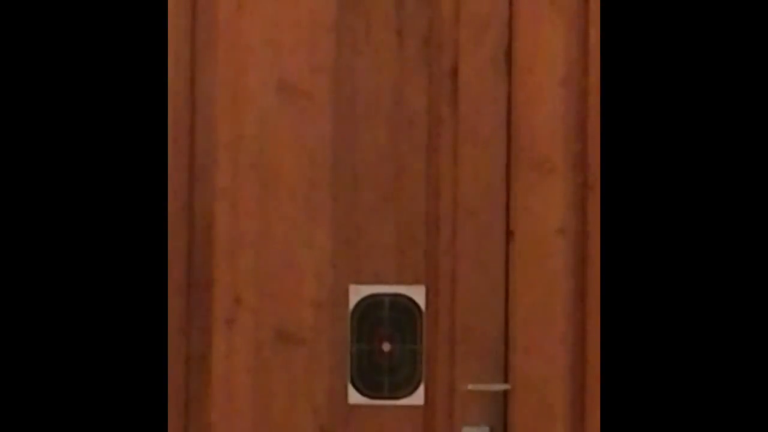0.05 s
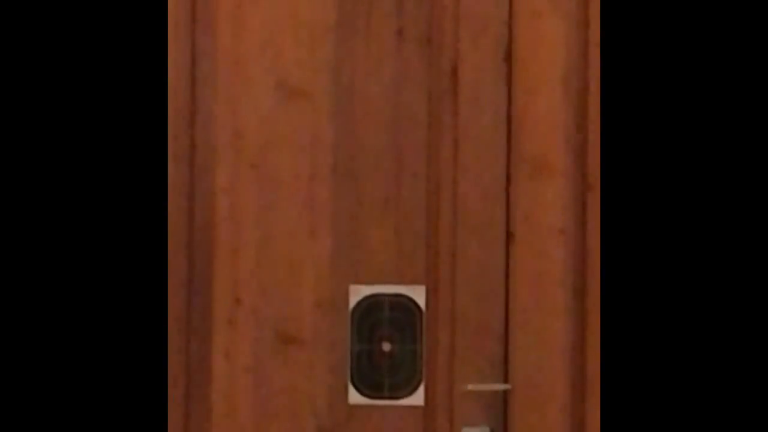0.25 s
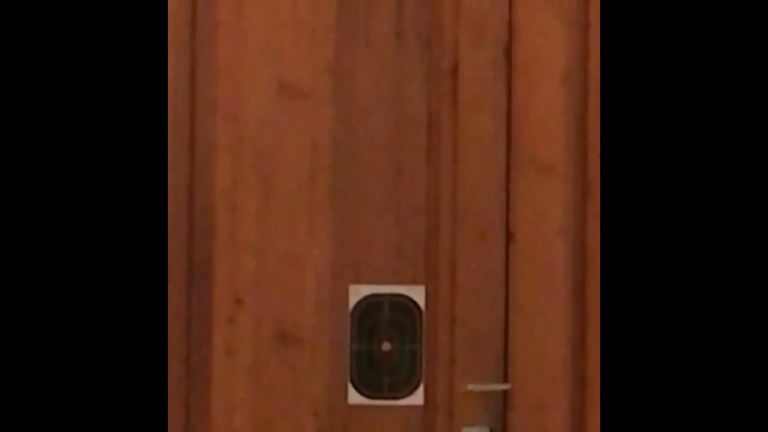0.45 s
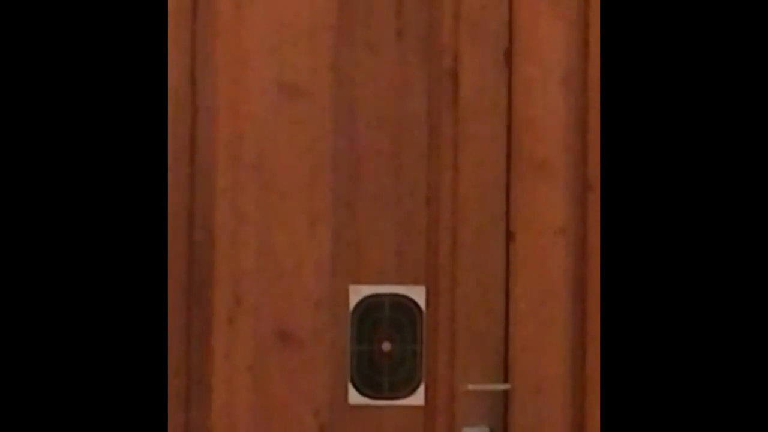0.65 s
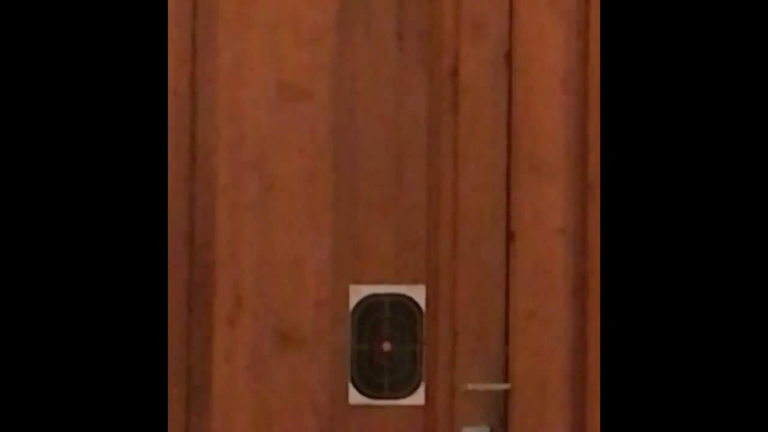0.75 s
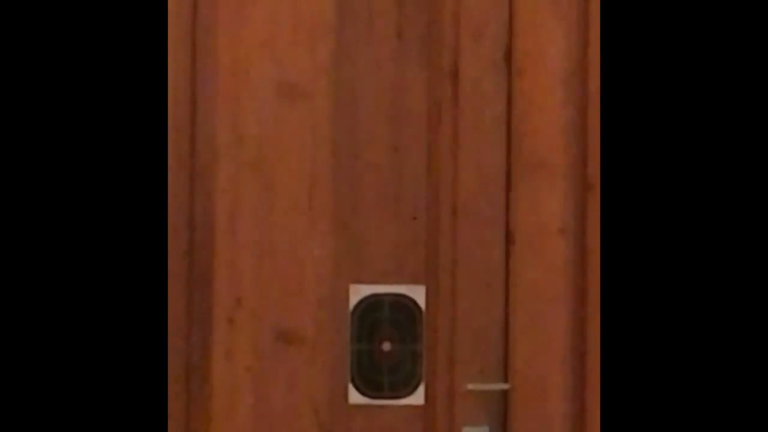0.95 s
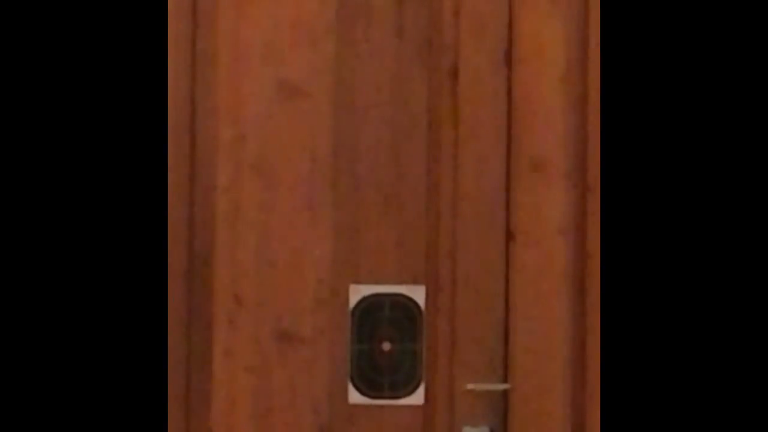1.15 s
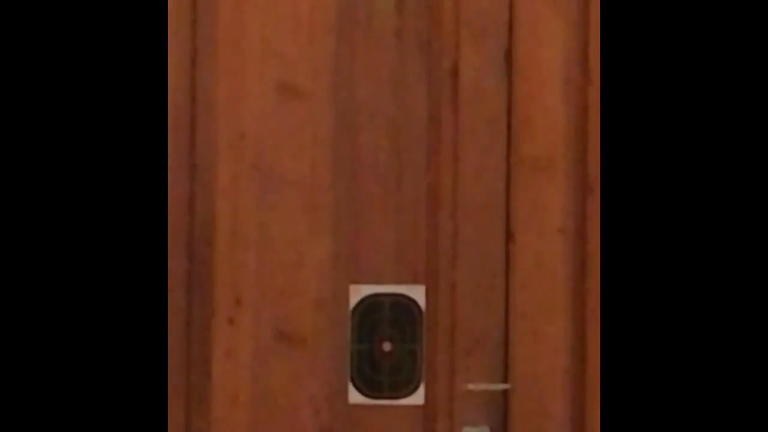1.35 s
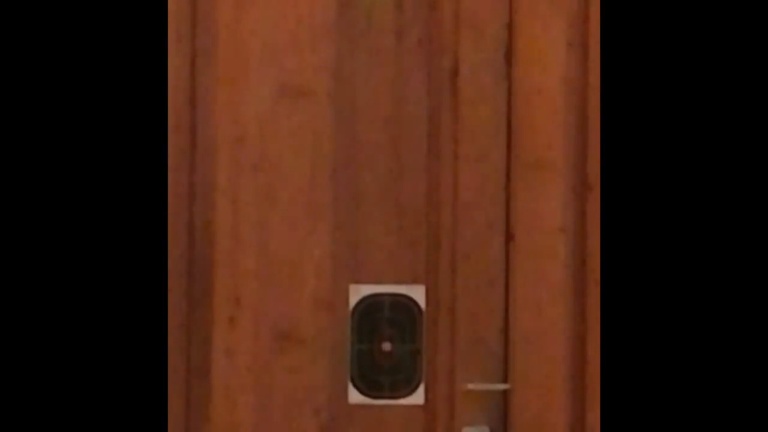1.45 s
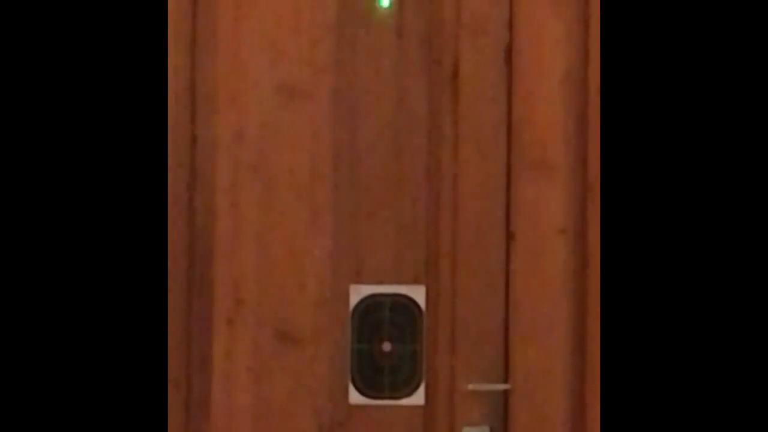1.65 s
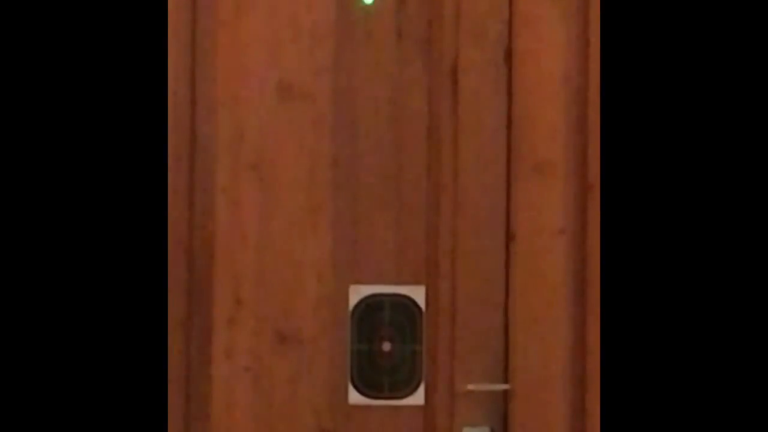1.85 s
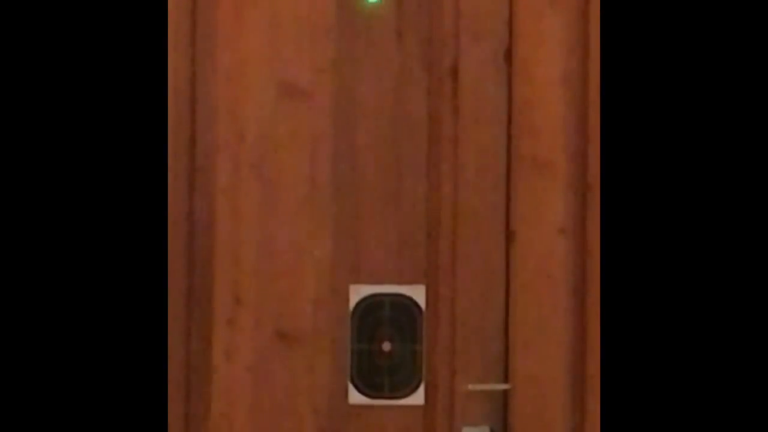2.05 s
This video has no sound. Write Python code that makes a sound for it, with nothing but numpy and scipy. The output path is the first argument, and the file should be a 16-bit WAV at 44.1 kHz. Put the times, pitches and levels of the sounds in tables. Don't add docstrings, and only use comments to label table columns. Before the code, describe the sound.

One loud metallic snap of an empty pistol's striker, ringing briefly over a faint appliance hum

```python
import sys
import numpy as np
from scipy import signal
from scipy.fft import rfft, irfft
from scipy.io import wavfile

SR = 44100
rng = np.random.default_rng(int(sys.argv[2]) if len(sys.argv) > 2 else 0)


def linear_from_db(decibels):
    return 10 ** (np.asarray(decibels, float) / 20)


def bounce(signal):
    frames = np.transpose(np.atleast_2d(signal))
    limited = np.clip(frames, -1, 1)
    pcm = np.round(limited * 32767).astype(np.int16)
    wavfile.write(sys.argv[1], SR, pcm)


N = 93403
BLOW_S = 1.79073


def evened(x):
    return x / np.sqrt(np.mean(x ** 2) + 1e-20)


def read(points, hz):
    f, value = np.transpose(points)
    return np.interp(np.log(hz + 1), np.log(f + 1), value)


def add(mix, s, sound):
    part = mix[round(s * SR):][:len(sound)]
    part += sound[:len(part)]


def resonate(x, hz, width):
    turn = np.exp(2j * np.pi * hz * np.arange(len(x)) / SR)
    r = np.exp(-np.pi * width / SR)
    return 2 * (turn * signal.lfilter([1 - r], [1, -r], x / turn)).real


def colour(x, points):
    hz = np.fft.rfftfreq(len(x), 1 / SR)
    return irfft(rfft(x) * linear_from_db(read(points, hz)), len(x))


# (frequency [Hz], level [dB per Hz])
AIR_COLOUR = [(20, -49), (60, -1), (150, -3.5), (500, -7.5), (1090, -17), (2200, -23.5), (5000, -27.5),
              (16000, -37)]
# (frequency [Hz], width [Hz], gain [dB])
PORT_DIPS = [(7400, 500, -2.5), (10300, 700, -3)]


def room_tone():
    hz = np.fft.rfftfreq(N, 1 / SR)
    dips = sum(db * np.exp(-((hz - f) / width) ** 2) for f, width, db in PORT_DIPS)
    noise = irfft(rfft(rng.standard_normal(N)) * linear_from_db(dips), N)
    return linear_from_db(-61) * evened(colour(noise, AIR_COLOUR))


# (frequency [Hz], width [Hz], level [dB])
HUM = [(68.5, 32, -63), (123, 11, -74), (411, 4.2, -74.5), (584.4, 83.4, -59), (581, 4.7, -65.5),
       (890, 51, -70.5), (1620, 220, -73.5)]
# (frequency [Hz], level [dB])
MOTOR = [(156.5, -63), (337, -66)]


def appliance():
    out, t = np.zeros(N), np.arange(N) / SR
    for hz, width, db in HUM:
        band = resonate(rng.standard_normal(N), hz, width)
        out += linear_from_db(db) * evened(resonate(band, hz, 2 * width))
    waver = evened(resonate(rng.standard_normal(N), 0, 3.4))
    for hz, db in MOTOR:
        out += linear_from_db(db + 3 + 1.5 * waver) * np.sin(2 * np.pi * hz * t + .4 * waver)
    return out


def camera_whine():
    t, whine_hz = np.arange(N) / SR, 991.9
    whine = sum(np.sin(2 * np.pi * (k * whine_hz * t + rng.random())) for k in range(2, 16))
    return linear_from_db(-97.5) * whine


# (frequency [Hz], time to fall 60 dB [s])
ROOM_DECAY = [(700, 0.33), (1500, 1), (3000, 0.78), (6000, 0.94), (9000, 0.75), (12000, 0.49),
              (16000, 0.61)]
# (frequency [Hz], gain [dB])
ROOM_COLOUR = [(500, -8.5), (1000, -7), (2000, 2.5), (5000, 1.5), (10000, 0), (16000, -2)]


def room():
    fill_db, early_db, early_t60 = -16, 4.5, 0.26
    hz, t, z = signal.stft(rng.standard_normal(SR // 2), SR, nperseg=512)
    peaks = sum(linear_from_db(db) ** 2 / (1 + (2 * (hz - f) / width) ** 2) for f, width, db in STEEL)
    tint = np.sqrt(peaks + linear_from_db(fill_db) ** 2) * linear_from_db(read(ROOM_COLOUR, hz))
    late = linear_from_db(-60 * t / read(ROOM_DECAY, hz)[:, None])
    early = linear_from_db(early_db - 60 * t / early_t60)
    echoes = signal.istft(z * (late + early) * tint[:, None], SR, nperseg=512)[1]
    arrival = np.clip((np.arange(len(echoes)) / SR - .006) / 0.0087, 0, 1)
    out = np.zeros(N)
    add(out, BLOW_S, linear_from_db(-16) * echoes * arrival)
    return out


# (time [s], level [dB], frequency [Hz], time to fall 60 dB [s])
KNOCKS = [(1.7677, -31, 620, .012), (1.7762, -33, -400, .06), (1.7805, -19, 332, .0154),
          (1.7832, -15, -210, .0215), (1.78795, -4.4, 257, .0124), (1.7916, -5, 362, .0214),
          (1.79135, -1, -1050, .004), (1.79075, -2, -3100, .004), (1.7861, -21, 2900, .008),
          (1.7932, -14, 1150, .008), (1.7945, -15, 4608, .03), (2.103, -40, 2880, .022)]


def knocks():
    out, t = np.zeros(N), np.arange(SR // 4) / SR
    for s, db, hz, t60 in KNOCKS:
        onset = np.sin(np.pi / 2 * np.minimum(2.4 * abs(hz) * t, 1))
        add(out, s, linear_from_db(db - 60 * t / t60) * onset * np.sin(2 * np.pi * hz * t))
    return out


def jolt():
    hz, level_db, t60, stop_s = 50.6, -2.4, .086, .042
    sweep_turns, sweep_s = 1.53, .00214
    swell, swell_s = .88, .0045
    out, t = np.zeros(N), np.arange(SR // 4) / SR
    turns = hz * t + sweep_turns * (1 - np.exp(-t / sweep_s))
    growth = 1 + swell * (1 - np.exp(-(t / swell_s) ** 2))
    stop = np.exp(-(t / stop_s) ** 6)
    add(out, BLOW_S, growth * stop * linear_from_db(level_db - 60 * t / t60) * np.sin(2 * np.pi * turns))
    sway_s, sway_length_s, sway_db, sway_hz = 1.8277, .075, -42, 35.4
    sway = np.sin(np.pi * np.minimum(t / sway_length_s, 1)) * np.cos(2 * np.pi * sway_hz * t)
    add(out, sway_s, linear_from_db(sway_db) * sway)
    return out


RING_HZ = [1972, 3577, 4469, 4615, 4716, 5679, 5963, 5992, 7483, 9177, 9249, 9532, 11181, 12807]
# (level [dB], time to fall 60 dB [s])
RINGS = [(-51, .6), (-47, .4), (-51, .37), (-47, .4), (-48, .4), (-49, .6), (-46, .4), (-39, .6),
         (-45, .32), (-39, .45), (-42, .45), (-41, .35), (-43, .25), (-42, .3)]


def rings():
    out, t = np.zeros(N), np.arange(SR // 2) / SR
    onset = np.minimum(t / .004, 1)
    for hz, (db, t60) in zip(RING_HZ, RINGS):
        add(out, BLOW_S, linear_from_db(db + 7 - 60 * t / t60) * onset * np.sin(2 * np.pi * hz * t))
    return out


TICK_S = [1.7673, 1.7706, 1.7790, 1.7837, 1.7859, 1.7903, 1.7908, 1.7930, 1.7953, 1.8018]
# (level [dB], crack length [s], brightness [about 1.5 dB per octave above 1800 Hz])
TICKS = [
    (-43, 0.0014, -1),
    (-49, 0.0017, 3.5),
    (-46.5, 0.0018, -3.5),
    (-33, 0.0034, -11),
    (-29, 0.0022, -4.5),
    (-9.5, 0.00069, -5.5),
    (-14, 0.0018, -2.5),
    (-16.5, .0022, 3),
    (-14, 0.0033, 1.5),
    (-22, 0.0064, 1.5),
]
# (frequency [Hz], width [Hz], level [dB])
STEEL = [(1560, 250, -19), (1990, 69, -12.5), (3546, 150, -5.5), (4520, 94, -3.5), (4600, 190, -8),
         (5660, 150, -14), (6000, 170, -3), (7310, 110, -7.5), (8350, 230, -15), (9390, 427, 2.5),
         (11570, 240, -2.5), (12880, 240, 2), (13400, 170, -12), (15200, 390, -18)]


def steel():
    drive, t = np.zeros(N), np.arange(512) / SR
    for s, (db, length, tilt_db) in zip(TICK_S, TICKS):
        tilt = [(900, 0), (1800, -1.6 * tilt_db), (16000, 3.2 * tilt_db)]
        crack = evened(colour(rng.standard_normal(512), tilt))
        shape = np.minimum(t / .0003, 1) * np.exp(-(t / length) ** 2)
        add(drive, s, linear_from_db(db) * crack * shape)
    ringing = sum(linear_from_db(db + 13) * resonate(drive, hz, width) for hz, width, db in STEEL)
    return linear_from_db(0.5) * drive + ringing


def scene():
    background = room_tone() + appliance() + camera_whine()
    pistol = knocks() + jolt() + rings() + steel()
    return (background + room() + pistol)[None]


def band_limit(x):
    return signal.sosfilt(signal.butter(12, 16540, fs=SR, output="sos"), x)


def record(dry):
    trip_level, duck_db, hold_s, release_s = .33, -6, .197, .018
    low_cut_hz, low_cut_share, low_cut_after_s = 200, .7, .11
    since = np.arange(N) / SR - np.argmax(abs(dry[0]) > trip_level) / SR
    drop = np.clip(since / .0003 + 1, 0, 1)
    let_go = np.clip(1 - (since - hold_s) / release_s, 0, 1)
    bass = signal.sosfiltfilt(signal.butter(2, low_cut_hz, fs=SR, output="sos"), dry)
    low_cut = low_cut_share * np.clip((since - low_cut_after_s) / release_s, 0, 1)
    mix = (dry - low_cut * bass) * linear_from_db(duck_db * drop * let_go)
    mix = signal.oaconvolve(mix, signal.firwin(767, 15750, fs=SR)[None], "same")
    return band_limit(mix)


dry = scene()
out = record(dry)
bounce(out)
```